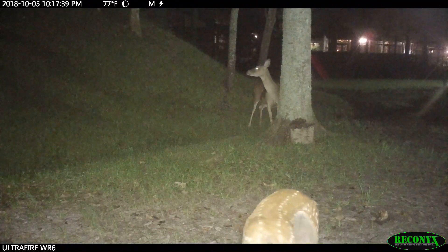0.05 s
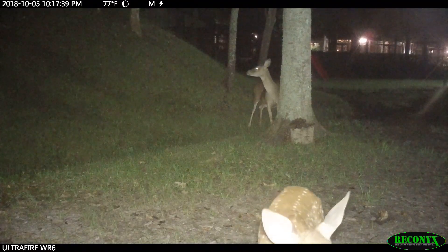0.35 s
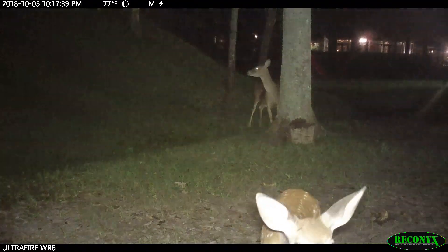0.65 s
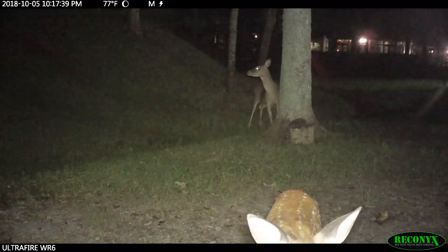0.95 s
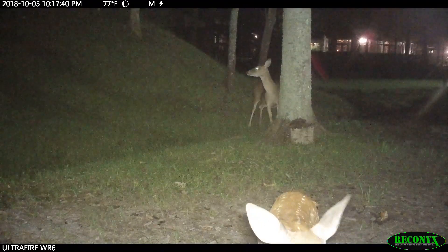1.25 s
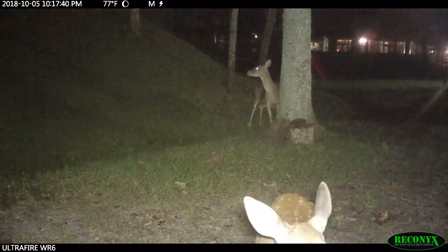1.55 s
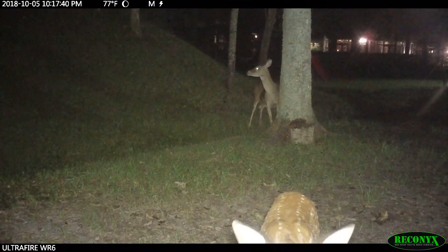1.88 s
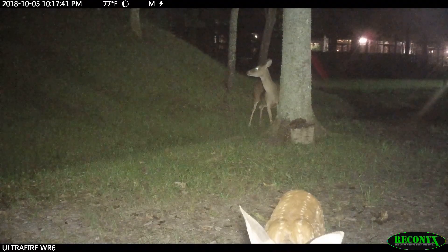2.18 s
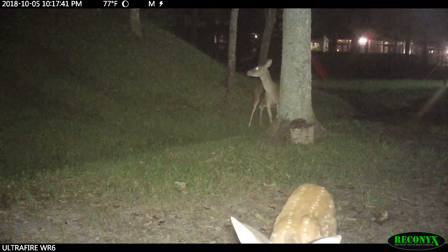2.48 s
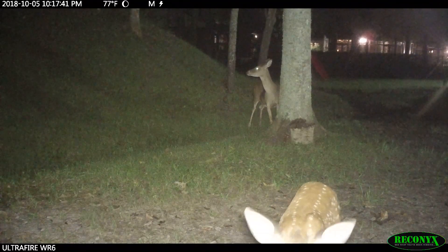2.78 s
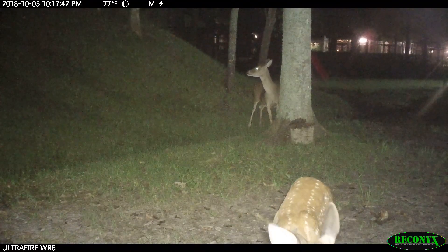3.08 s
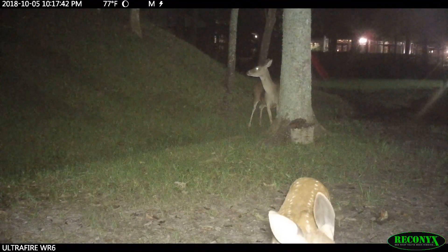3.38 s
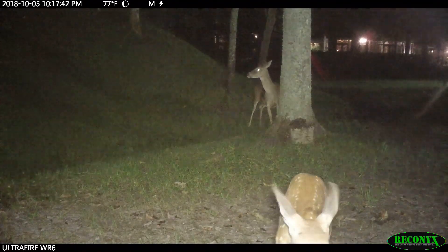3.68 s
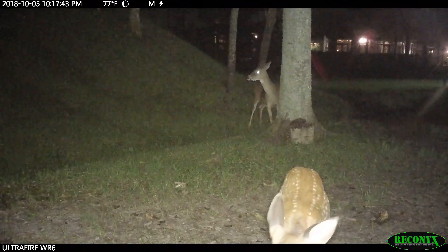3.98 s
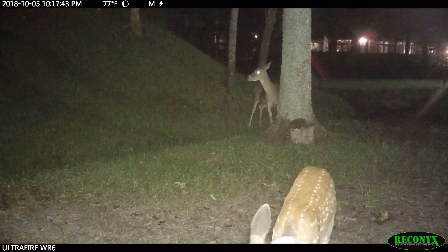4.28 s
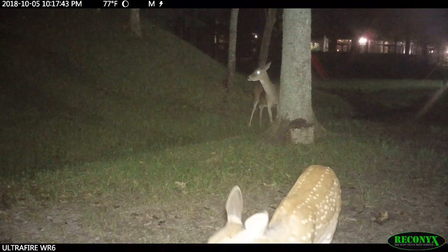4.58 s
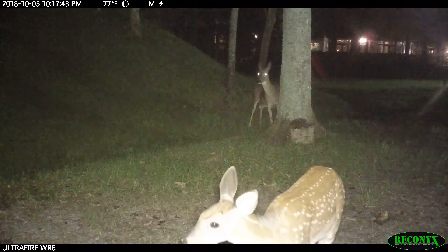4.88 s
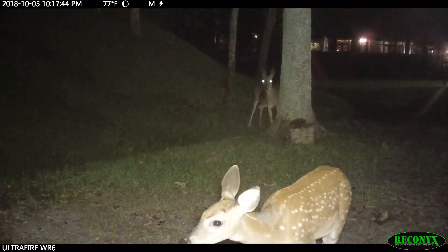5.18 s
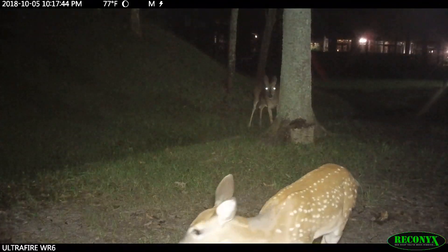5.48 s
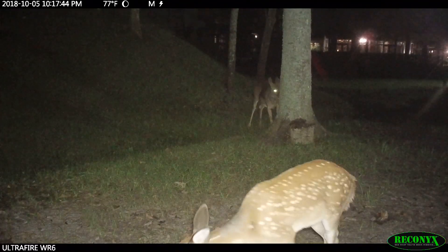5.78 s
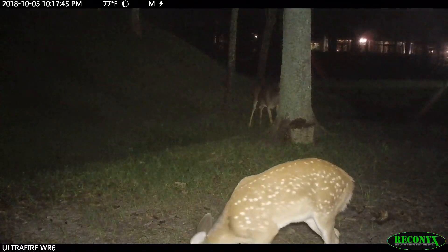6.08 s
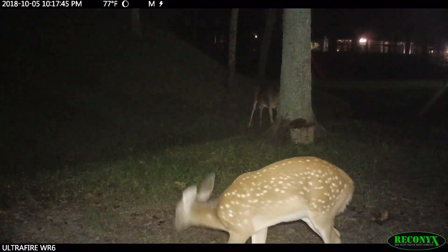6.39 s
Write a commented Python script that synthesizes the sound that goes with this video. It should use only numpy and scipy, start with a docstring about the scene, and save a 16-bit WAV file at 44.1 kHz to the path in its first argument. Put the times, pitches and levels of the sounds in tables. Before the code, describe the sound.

High, pulsing cricket chirps ride over continuous insect trilling, with a faint distant town hum and a few tiny ticks as a fawn stirs.

```python
"""Bush crickets chirp close by, in loose unison about twice a second, on a wooded lawn at night.
Tree crickets and small crickets trill on and a ground cricket throbs above them, each drawing a scraper
along the file of its wing; ground, leaves and trunks scatter the nearer songs. A distant town hums, and
now and then a fawn stirs the grass. The microphone is a trail camera's: nearly everything is on the right,
with only electronic hiss and a trace of the insects on the left."""
import sys
import numpy as np
from scipy import signal
from scipy.fft import rfft, irfft, next_fast_len
from scipy.io import wavfile
from scipy.ndimage import uniform_filter1d

SR = 44100
rng = np.random.default_rng(int(sys.argv[2]) if len(sys.argv) > 2 else 0)


def unload_wav(signal):
    """Save mono or channel-first audio to the path in sys.argv[1] as 16-bit WAV at rate SR, clipped to [-1, 1]."""
    wavfile.write(
        sys.argv[1],
        SR,
        np.round(np.clip(np.atleast_2d(signal).T, -1, 1) * 32767).astype(np.int16),
    )


N = 284445
TIME = np.arange(N) / SR


def undb(db):
    """Decibels to gain."""
    return 10 ** (np.asarray(db) / 20)


def unit(x):
    """Scale to rms 1."""
    return x / np.sqrt(np.mean(x ** 2) + 1e-20)


def add(out, start, sound):
    """Mix a sound into both channels from start [s] on."""
    first = max(int(start * SR), 0)
    out[:, first:first + sound.shape[-1]] += sound[..., :N - first]


def walk(rate):
    """Smooth random drift with a spread near 1, changing rate times a second."""
    knots = rng.standard_normal(1024)
    place = TIME * rate
    step = place.astype(int)
    ease = .5 - .5 * np.cos(np.pi * (place - step))
    return knots.take(step, mode="wrap") * (1 - ease) + knots.take(step + 1, mode="wrap") * ease


def noise(points):
    """Noise with a spectrum through points of (frequency [Hz], density [dB per Hz])."""
    size = next_fast_len(N)
    hz, db = np.transpose(points)
    bins = np.maximum(np.fft.rfftfreq(size, 1 / SR), 1)
    gain = undb(np.interp(np.log(bins), np.log(hz), db)) * np.sqrt(SR / 2)
    return irfft(rfft(rng.standard_normal(size)) * gain, size)[:N]


def woods(x, early_db, late_db, early_t60=0.046, late_t60=0.59):
    """Direct sound, quick reflections off ground and leaves, a thin tail off trunks; a path a channel."""
    t = TIME[:SR // 3]
    paths = []
    for _ in range(2):
        early = unit(rng.standard_normal(len(t)) * 1000. ** (-t / early_t60))
        late = unit(rng.standard_normal(len(t)) * 1000. ** (-t / late_t60))
        echo = (undb(early_db) * early + undb(late_db) * late) / np.sqrt(len(t))
        echo[0] += 1  # straight to the microphone
        paths.append(unit(signal.oaconvolve(x, echo)[:len(x)]))
    return np.array(paths) * np.sqrt(np.mean(x ** 2))


def wings(pitch_hz, stroke_hz, fall, duty):
    """Envelope and phase of strokes: the scraper slows along the file and is silent on the way back."""
    cycle = (np.cumsum(stroke_hz) / SR + rng.random()) % 1
    stroke = np.minimum(cycle / duty, 1)
    phase = 2 * np.pi * np.cumsum(pitch_hz * (1 + fall * (.5 - stroke))) / SR
    return np.sin(np.pi * stroke), phase


def near_bush_crickets(stroke_hz=51, scoop=0.01393, scoop_s=0.0303, attack_s=0.0076, release_s=0.026):
    """Chirps from separate perches near the microphone: runs of strokes that climb to their pitch."""
    # nearby chirps: (start [s], length [s], pitch [Hz], level [dB], octave overtone [dB re fundamental])
    chirps = [(0.0, 0.22, 5420, -30.5, -33), (0.63, 0.24, 5370, -28.5, -32),
              (1.144, 0.41, 5330, -34.5, -38), (1.729, 0.31, 5420, -33, -31), (2.32, 0.3, 5550, -34.5, -30),
              (2.935, 0.18, 5440, -31, -32), (3.426, 0.18, 5347, -29, -29), (3.55, 0.21, 5350, -39.5, -20),
              (3.994, 0.3, 5310, -42, -34), (4.485, 0.31, 5590, -32.5, -35), (4.578, 0.24, 5440, -43, -17),
              (5.143, 0.34, 5470, -31.5, -34), (5.755, 0.23, 5354, -28.5, -31),
              (6.092, 0.35, 5296, -34, -26), (6.34, .2, 5650, -40, -29)]
    out = np.zeros((2, N))
    t = TIME[:SR // 2]
    for start, length, pitch_hz, db, octave_db in chirps:
        glide = 1 - scoop * np.exp(-t / scoop_s) + 0.00419 * walk(119.4)[:len(t)]
        strokes, phase = wings(pitch_hz * glide, np.full(len(t), stroke_hz), fall=.033, duty=0.423)
        shape = np.clip(np.minimum(t / attack_s, (length - t) / release_s), 0, 1)
        tone = np.sin(phase) + undb(octave_db) * np.sin(2 * phase)
        chirp = unit(shape * strokes * tone) * np.sqrt(length / t[-1])
        add(out, start, undb(db) * woods(chirp, early_db=-2, late_db=-1))
    return out


def crowd(centre_hz, below_hz, above_hz, stroke_hz, fall, count, strokes=3):
    """Countless far crickets: short runs of strokes, fading to -30 dB either side of the common pitch."""
    t = TIME[:int(strokes / stroke_hz * SR)]
    stroke = np.minimum(2 * (t * stroke_hz % 1), 1)
    cycles_per_hz = np.cumsum(1 + fall * (.5 - stroke)) / SR
    envelope = np.sin(np.pi * stroke)
    # golden-ratio steps keep the band evenly filled at all times
    place = 2 * ((np.arange(count) * (np.sqrt(5) - 1) / 2 + rng.random(count) / 20) % 1) - 1
    pitches = centre_hz + np.where(place < 0, below_hz, above_hz) * place
    starts = (np.arange(count) + rng.random(count)) / count * (N + len(t))
    turns = rng.random((count, 2, 1))  # each run reaches the two channels at different phases
    out = np.zeros((2, N + 2 * len(t)))
    for first, hz, db, turn in zip(starts.astype(int), pitches, -30 * abs(place), turns):
        tone = np.sin(2 * np.pi * (hz * cycles_per_hz + turn), dtype=np.float32)
        out[:, first:first + len(t)] += undb(db) * envelope * tone
    return unit(out[:, len(t):len(t) + N])


def throb(rate_hz, crest_s, swing_db, slowing_hz_per_s=0):
    """Gain of a song that swells and sinks by swing_db either way; its tempo may drop."""
    t = TIME - crest_s
    return undb(swing_db * np.cos(2 * np.pi * (rate_hz * t - slowing_hz_per_s * t ** 2 / 2)))


def far_bush_crickets(level_db=-29, octave_db=-38):
    """Deeper in the woods, a chorus swells and sinks at the pace of the near chirps."""
    song = crowd(centre_hz=5392, below_hz=680, above_hz=593, stroke_hz=51, fall=0.03926, count=5000)
    octave = unit(song ** 2 - uniform_filter1d(song ** 2, size=8))  # squaring doubles the pitch
    swell = throb(rate_hz=1.74, crest_s=.1, swing_db=1.6)
    return undb(level_db) * (song + undb(octave_db) * octave) * swell


def triller(pitch_hz, stroke_hz, fall, duty, waver, uneven_db):
    """One steadily trilling cricket; pitch, tempo and the force of its strokes waver."""
    pitch = pitch_hz * (1 + waver * walk(45))
    tempo = stroke_hz * (1 + .008 * walk(2))
    envelope, phase = wings(pitch, tempo, fall, duty)
    return unit(envelope * np.sin(phase) * undb(uneven_db * walk(30)))


def tree_crickets(near_db=-48.5, far_db=-52, rise_db_per_s=0.16):
    """A soft, low trill, slowly growing: two nearer singers, one pausing once, and many behind them."""
    # the nearer pair: (pitch [Hz], strokes [1/s], pitch fall in a stroke [share], relative level [dB])
    pair = [(2849, 58.4, .06, -16.5), (2830, 46.2, .06, -19)]
    first, second = (undb(db) * triller(hz, stroke_hz, fall, duty=0.49, waver=0.00708, uneven_db=1)
                     for hz, stroke_hz, fall, db in pair)
    rest_from_s, rest_to_s, fade_s = 2.46, 3.66, 0.08
    singing = np.clip(.5 + np.maximum(rest_from_s - TIME, TIME - rest_to_s) / fade_s, 0, 1)
    near = woods(unit(first + singing * second), early_db=-1, late_db=-3.5)
    far = crowd(centre_hz=2825, below_hz=255, above_hz=356, stroke_hz=55, fall=0.038, count=2500)
    return (undb(near_db) * near + undb(far_db) * far) * undb(rise_db_per_s * TIME)


def small_crickets(far_db=-37):
    """Three fast, high trills, heard mostly by reflection, in front of a far crowd of the same kind."""
    # the nearer singers: (pitch [Hz], strokes [1/s], pitch fall in a stroke [share], level [dB])
    singers = [(6240, 78.3, 0.065, -42), (6442, 92, .045, -42), (6280, 40, 0.052, -50)]
    near = sum(undb(db) * triller(hz, stroke_hz, fall, duty=.5, waver=0.00128, uneven_db=-1)
               for hz, stroke_hz, fall, db in singers)
    far = crowd(centre_hz=6403, below_hz=956, above_hz=1300, stroke_hz=84, fall=0.039, count=7000)
    return woods(near, early_db=9, late_db=-2.5) + undb(far_db) * far


def ground_crickets(pitch_hz=8500, stroke_hz=159.5, fall=0.15, duty=0.39, far_db=-54, near_db=-60):
    """A thin, even buzz across the lawn; one nearer singer with very fast strokes throbs in it."""
    far = crowd(centre_hz=8525, below_hz=1800, above_hz=920, stroke_hz=180, fall=0.1394,
                count=8000, strokes=4)
    tempo = stroke_hz * (1 + 0.000986 * walk(6.7))
    stroke = np.minimum(np.cumsum(tempo) / SR % 1 / duty, 1)
    # the phase starts afresh with each stroke, so all strokes sound alike
    cycles = pitch_hz * duty / stroke_hz * stroke * (1 + fall * (1 - stroke) / 2)
    song = unit(np.sin(np.pi * stroke) * np.sin(2 * np.pi * cycles))
    swell = throb(rate_hz=3.91, crest_s=.152, swing_db=5, slowing_hz_per_s=0.056)
    near = woods(song * swell, early_db=12, late_db=1)
    return undb(far_db) * far + undb(near_db) * near


def town(waver_hz=1.42):
    """Far off, a town rumbles and two machines hum, wavering in pitch and strength."""
    # town rumble, with microphone hiss on top: (frequency [Hz], density [dB per Hz])
    rumble = [(8, -56.5), (22, -65.5), (45, -62), (80, -69.5), (120, -75.5), (220, -83.5), (450, -89),
              (1000, -92.5), (4000, -93), (9500, -95.5), (13000, -100), (15000, -105)]
    # distant machines: (pitch [Hz], level [dB])
    machines = [(59.5, -57), (91, -56)]
    hum = np.zeros(N)
    for hz, db in machines:
        strength = 1 + 0.25 * walk(3.4)
        phase = 2 * np.pi * np.cumsum(hz + waver_hz * walk(5)) / SR
        hum += undb(db) * unit(strength * np.sin(phase))
    return noise(rumble) + hum


def chorus_flickers(pitch_hz=5370, length_s=0.0073):
    """Brief bright peaks at the chorus pitch, where overlapping songs happen to add up."""
    # peaks in the bush cricket chorus: (time [s], level [dB])
    peaks = [(0.834, -23.5), (1.932, -23), (2.379, -22), (3.129, -23.5), (3.571, -22.5), (5.782, -22.5),
             (5.924, -26)]
    out = np.zeros((2, N))
    t = TIME[:int(length_s * SR)]
    flicker = unit(np.sin(np.pi * t / length_s) * np.sin(2 * np.pi * pitch_hz * t))
    for start, db in peaks:
        add(out, start, undb(db) * flicker)
    return out


def fawn_in_grass(snap_s=0.0026, brush_s=0.016, brush_db=-14, rustle_db=-50, crackle_db=5):
    """A stem snaps with a bright tick and its neighbours brush back; one longer rustle crackles."""
    # stems snapping under the fawn: (time [s], level [dB])
    stems = [(2.789, -40), (2.793, -37), (4.82, -33), (4.86, -47), (4.872, -37), (4.931, -41), (4.983, -41),
             (6.247, -44)]
    middle_s, width_s = 4.87, 0.11
    rustle = np.exp(-.5 * ((TIME - middle_s) / width_s) ** 2)
    envelope = undb(rustle_db) * rustle * unit(undb(crackle_db * walk(590)))
    t = TIME[:SR // 8]
    tick = np.exp(-t / snap_s) + undb(brush_db) * np.exp(-t / brush_s)
    for start, db in stems:
        first = int(start * SR)
        envelope[first:first + len(t)] += undb(db) * tick[:N - first]
    return envelope * unit(noise([(1000, -21), (4000, -13), (7300, 6), (10000, -9), (15000, -18)]))


def scene(trace_db=-26):
    """Insects, fawn and town on the right; only a trace of the insects on the left."""
    bush_crickets = near_bush_crickets() + chorus_flickers() + far_bush_crickets()
    left, right = bush_crickets + tree_crickets() + small_crickets() + ground_crickets()
    return np.array([undb(trace_db) * left, right + fawn_in_grass() + town()])


def record(dry, top_hz=15000, dc_offset=-.038):
    """The trail camera hisses on the left and cuts the top steeply; its converter rests off zero."""
    # electronic noise of the left channel: (frequency [Hz], density [dB per Hz])
    hiss = [(10, -58.5), (50, -73), (200, -76.5), (500, -81), (1000, -86), (2200, -90.5), (4300, -94.5),
            (8000, -99), (13000, -101), (15000, -107)]
    noisy = dry + np.array([noise(hiss), np.zeros(N)])
    top_cut = signal.ellip(10, .1, 80, top_hz, fs=SR, output="sos")
    return dc_offset + signal.sosfilt(top_cut, noisy)


dry = scene()
out = record(dry)
unload_wav(out)
```